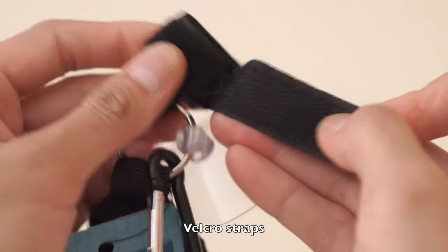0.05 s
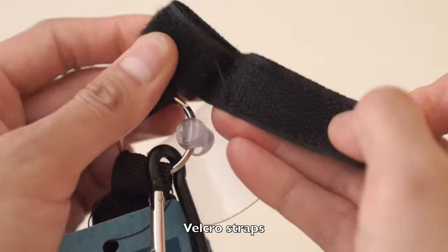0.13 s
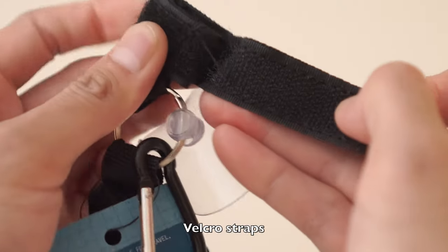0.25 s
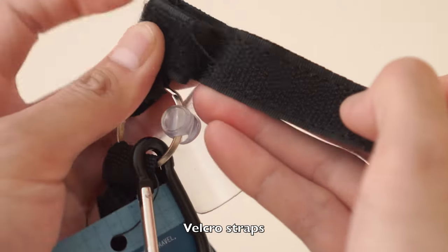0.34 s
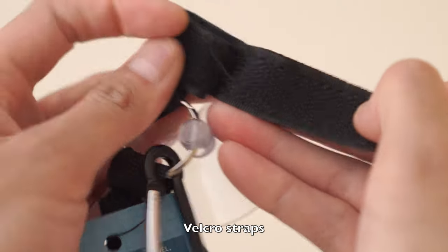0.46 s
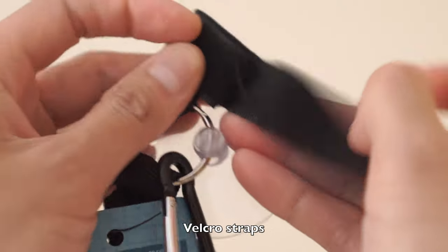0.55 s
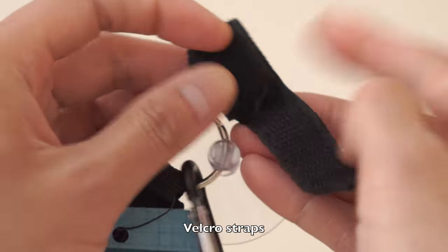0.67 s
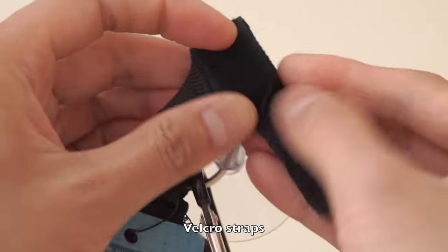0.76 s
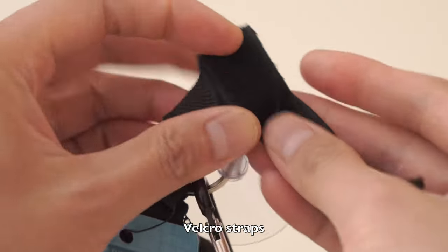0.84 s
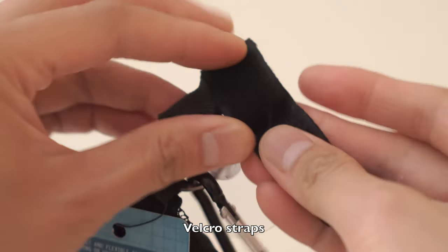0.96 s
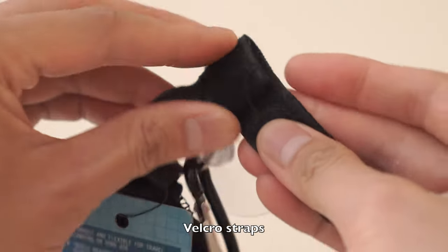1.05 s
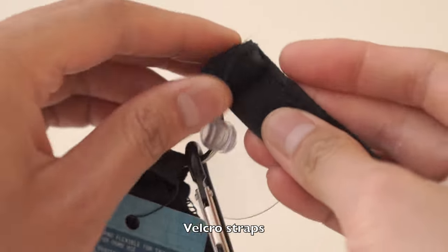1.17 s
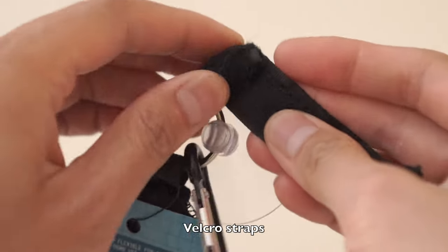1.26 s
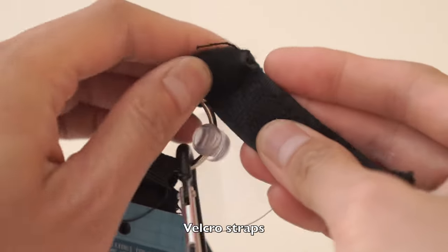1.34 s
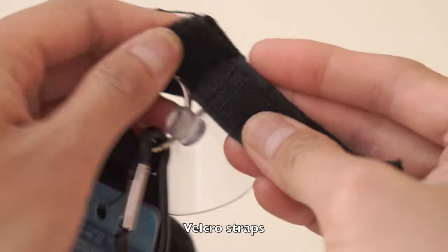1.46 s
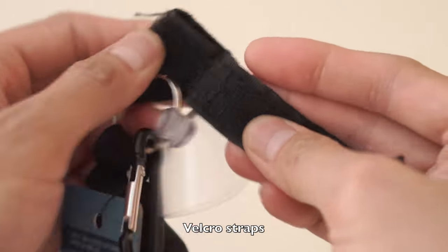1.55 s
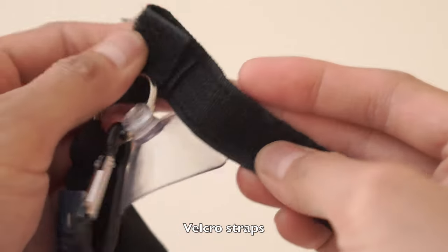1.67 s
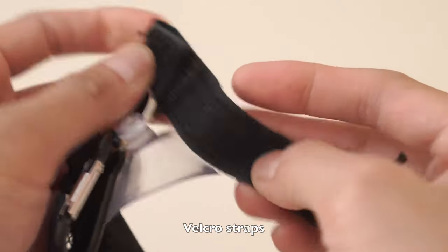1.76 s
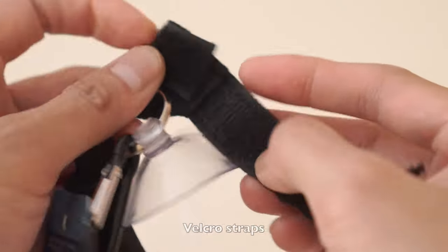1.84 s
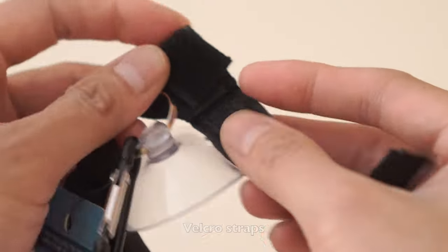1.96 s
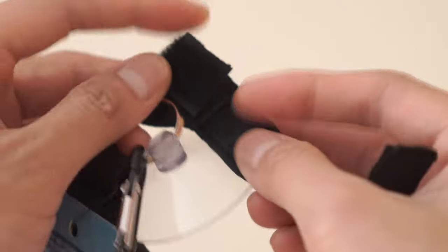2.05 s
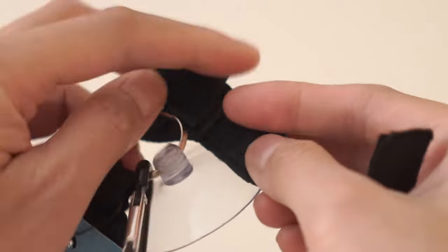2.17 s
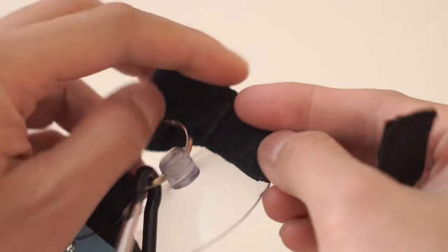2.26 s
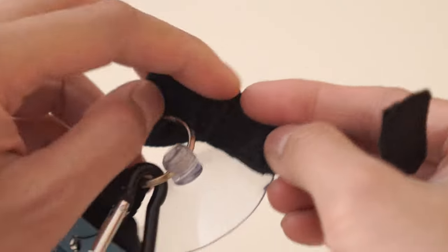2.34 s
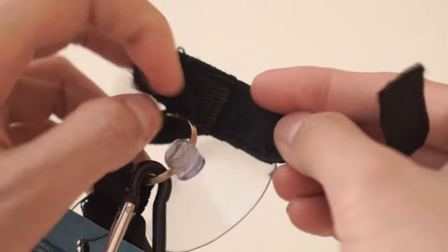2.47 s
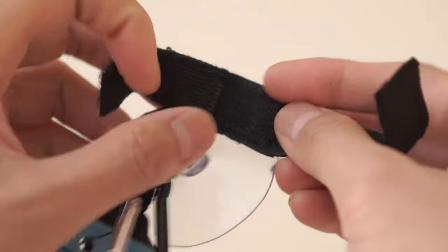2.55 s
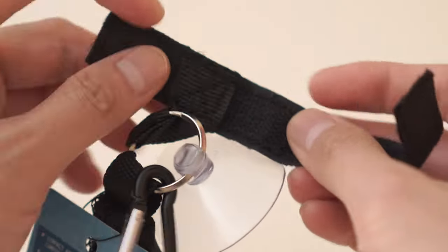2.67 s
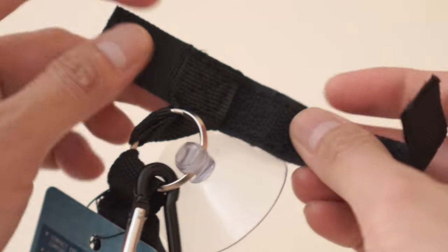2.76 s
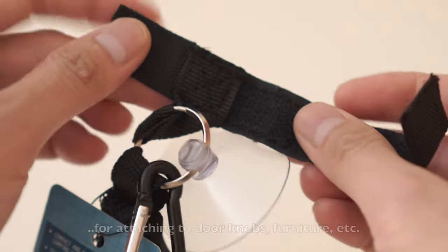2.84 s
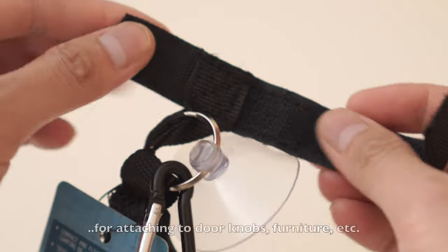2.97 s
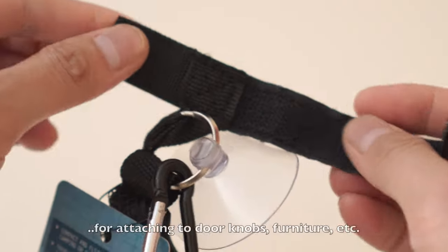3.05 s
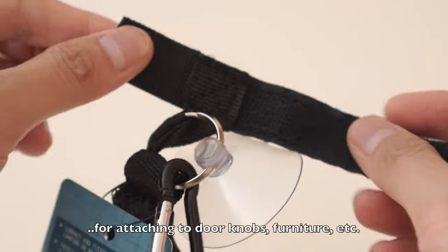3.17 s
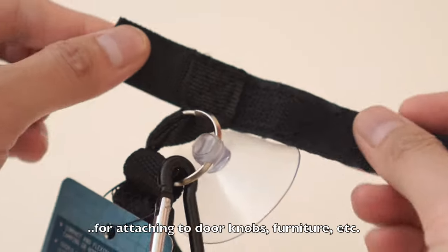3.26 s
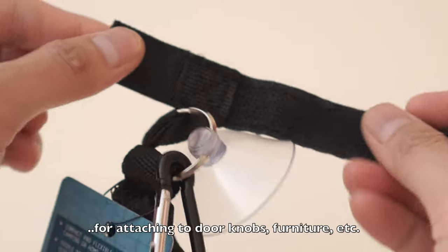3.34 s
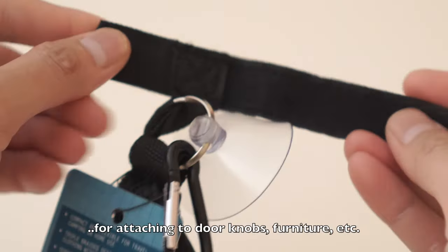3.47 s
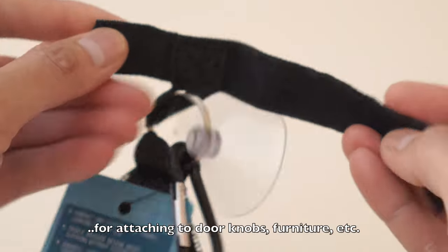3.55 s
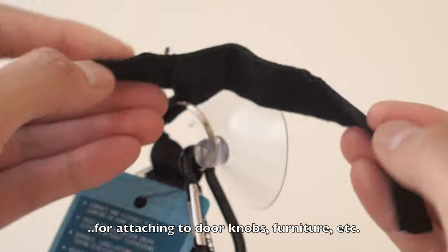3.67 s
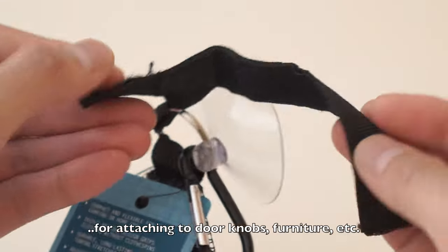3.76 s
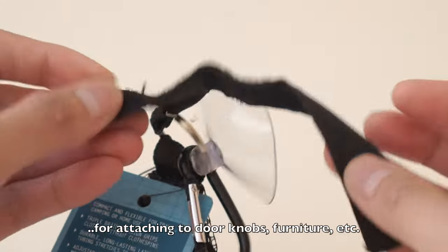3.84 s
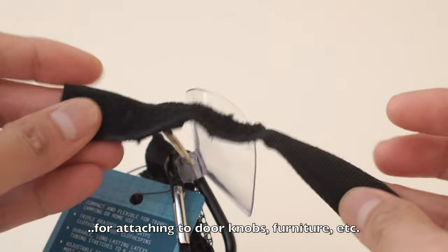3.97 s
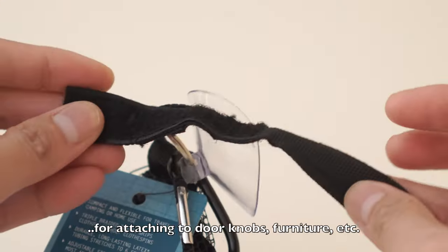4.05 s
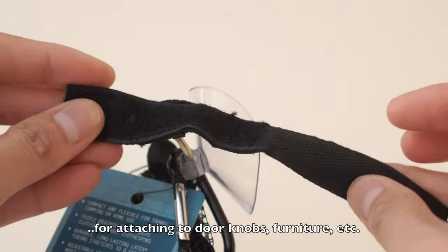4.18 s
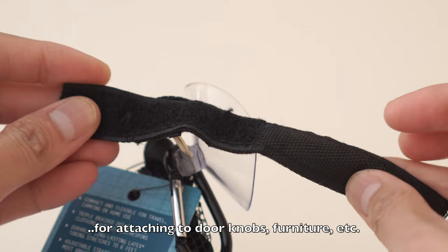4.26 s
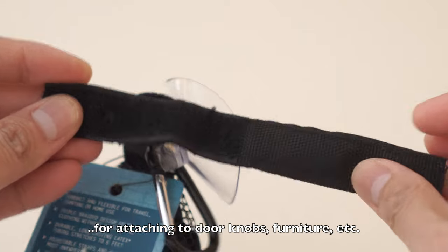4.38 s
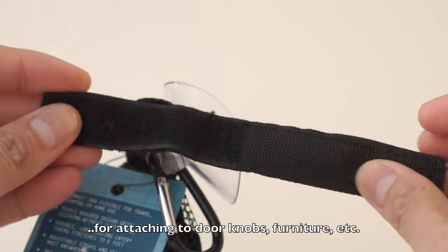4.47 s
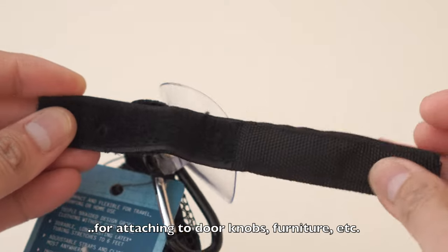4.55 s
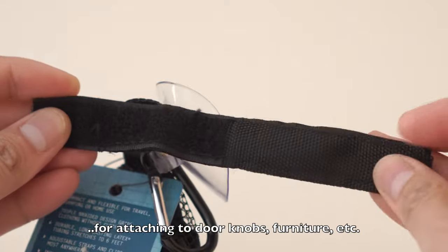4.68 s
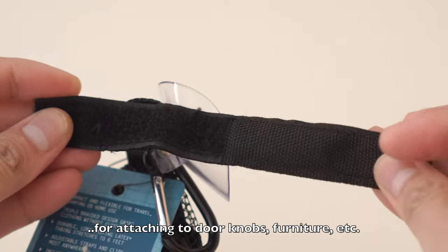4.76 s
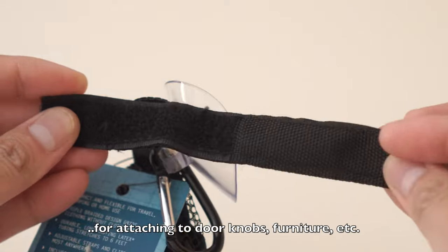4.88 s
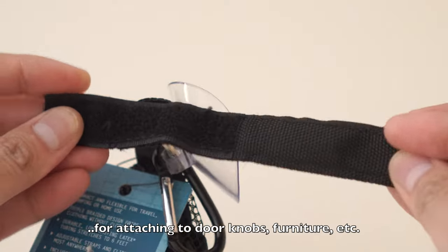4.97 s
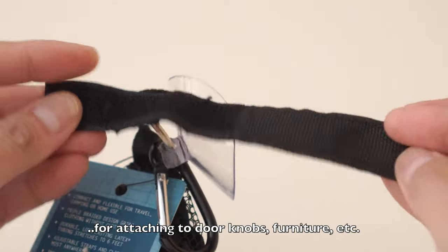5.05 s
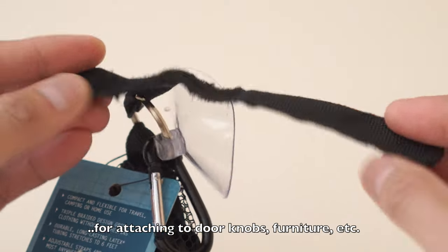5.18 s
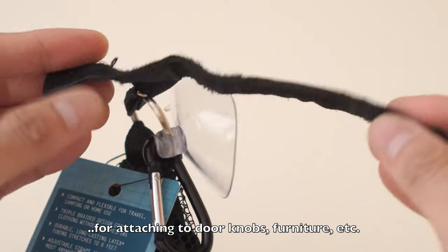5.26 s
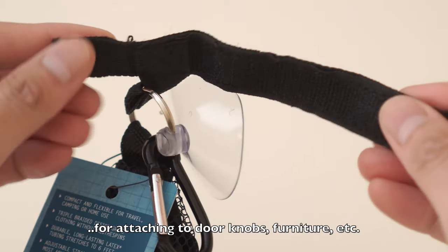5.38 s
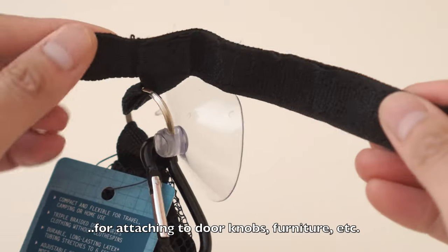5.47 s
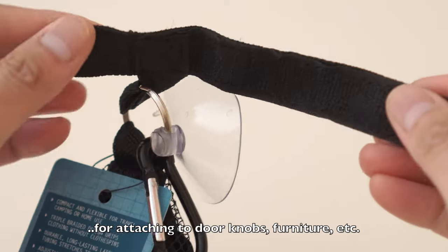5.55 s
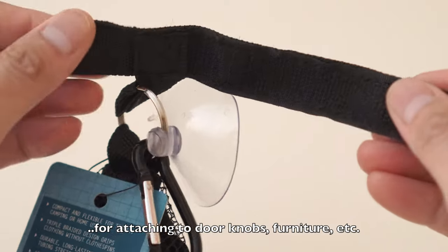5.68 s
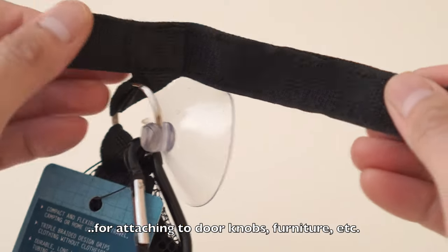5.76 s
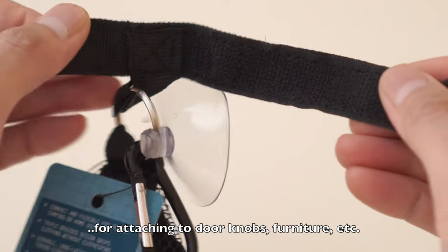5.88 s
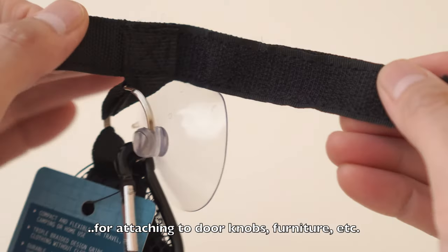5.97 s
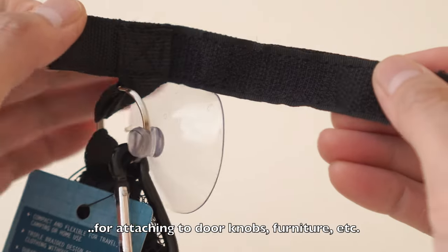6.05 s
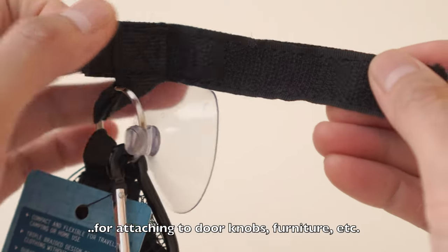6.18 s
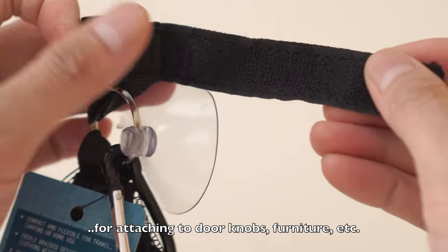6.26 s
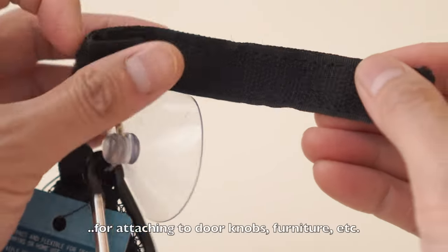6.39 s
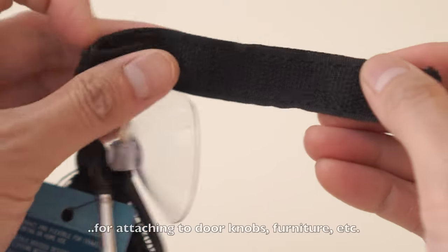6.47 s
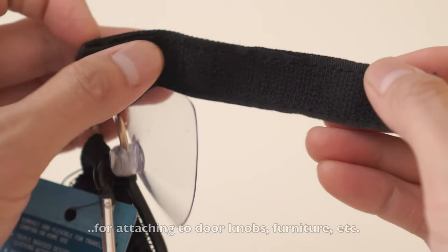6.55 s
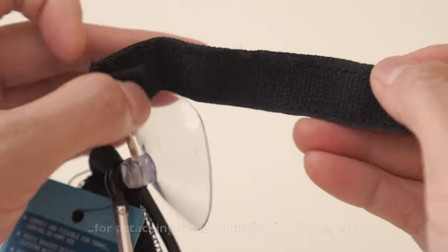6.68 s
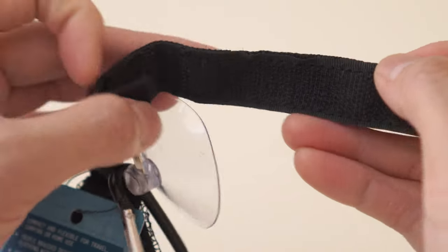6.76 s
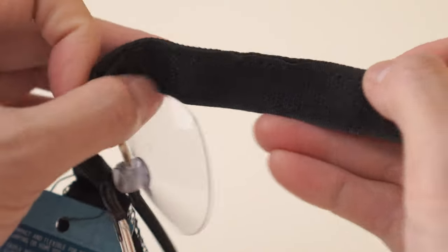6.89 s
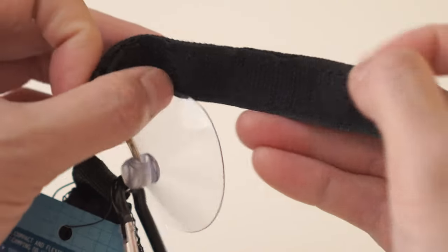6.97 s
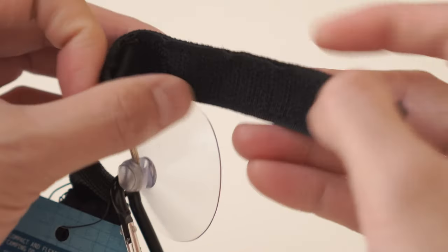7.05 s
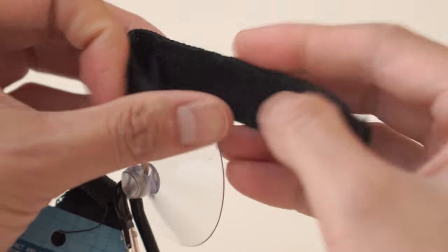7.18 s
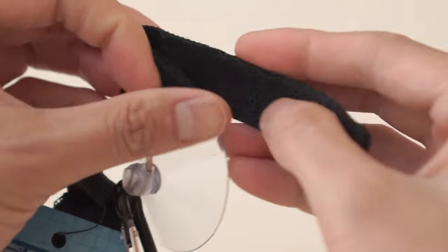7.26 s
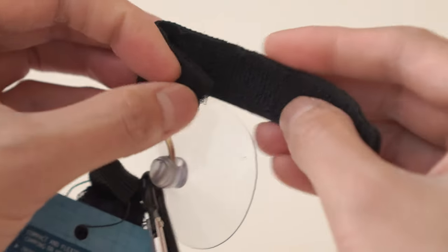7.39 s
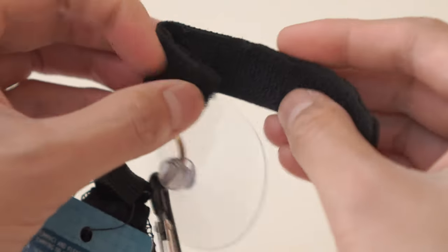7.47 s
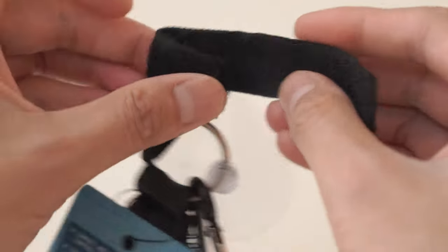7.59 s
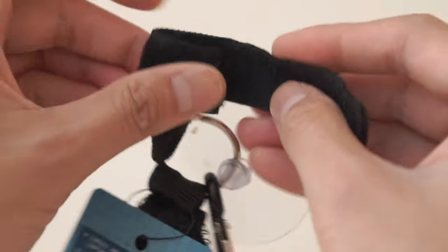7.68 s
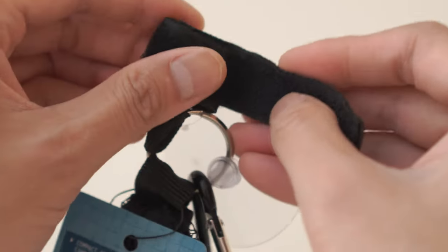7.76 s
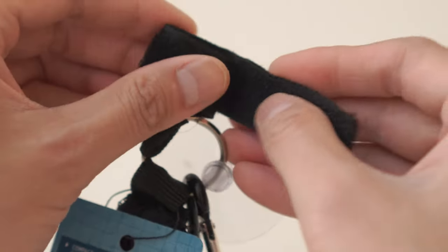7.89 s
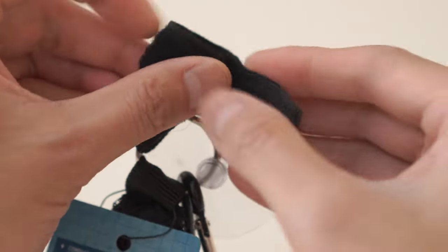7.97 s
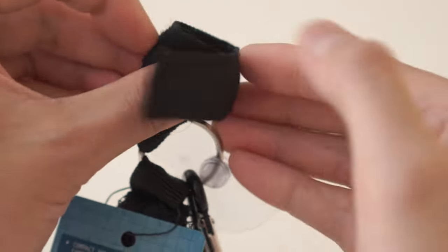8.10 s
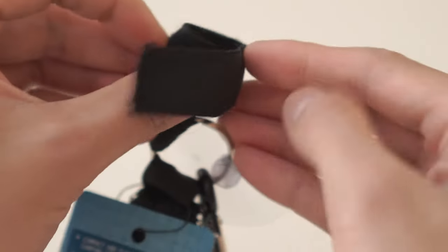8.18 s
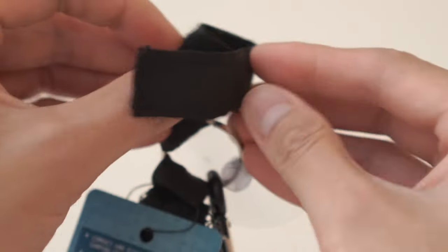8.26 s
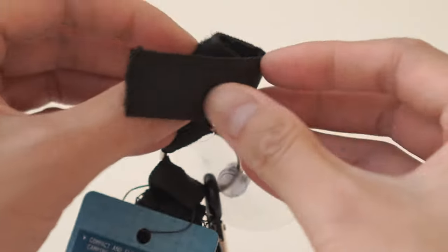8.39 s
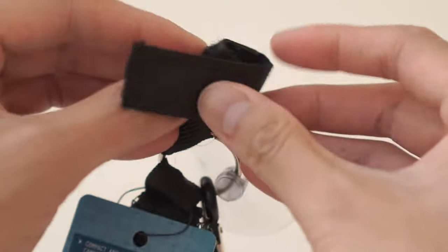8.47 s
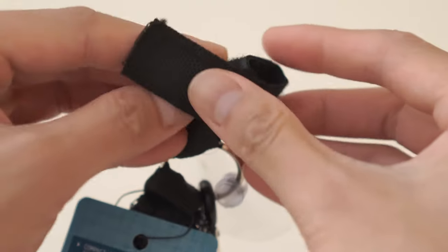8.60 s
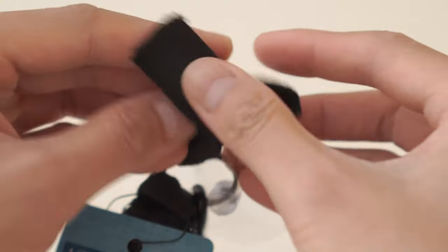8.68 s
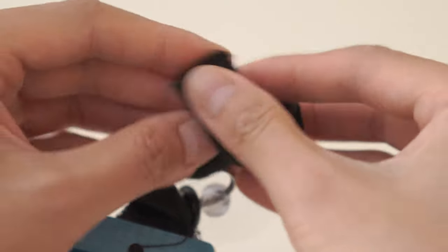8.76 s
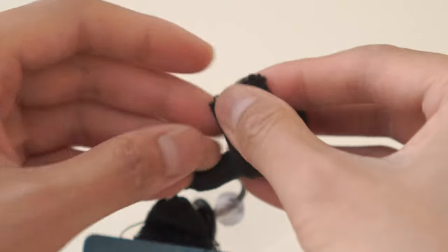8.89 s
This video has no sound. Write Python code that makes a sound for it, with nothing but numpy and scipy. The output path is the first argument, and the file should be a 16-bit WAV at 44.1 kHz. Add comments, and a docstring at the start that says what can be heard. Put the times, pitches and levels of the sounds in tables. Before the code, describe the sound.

Sharp, crisp fastener tearing in short bursts, followed by quiet webbing rubs, a light clatter of hanging fittings, and faint final ticks and zips.

```python
"""A small room with a faint hum: close to a stereo microphone, hands peel a hook-and-loop strap open,
straighten it and fold it shut again. Each tug tears a run of hooks, made of bunched clicks, with sharp snaps.
Finger strokes scratch the webbing (fibre clicks over smooth noise) and now and then skid with a short zip.
The suction cup, carabiner and steel ring hanging from the strap knock together as decaying sine modes.
The room answers with echoes that thicken into a tail, over steady air, a wavering hum and a soft rumble."""
import sys
import numpy as np
from scipy import signal
from scipy.fft import rfft, irfft, next_fast_len
from scipy.io import wavfile
from scipy.ndimage import uniform_filter1d

SR = 44100
rng = np.random.default_rng(int(sys.argv[2]) if len(sys.argv) > 2 else 0)


def dump_mix(stems):
    """Bounce the given channels to the path in sys.argv[1] as a 16-bit WAV at rate SR."""
    frames = np.atleast_2d(stems).T  # one column per channel
    limited = np.clip(frames, -1, 1)  # hard clip at full scale
    pcm = np.round(limited * 32767).astype(np.int16)
    wavfile.write(sys.argv[1], SR, pcm)


N = 393813
TIME = np.arange(N) / SR

# background swells: (time [s], hum fundamental [dB], rumble [dB])
HUM_SWELLS = [(1.4, -71, -70), (1.9, -59.5, -71), (3.0, -63.5, -73), (3.5, -68, -79.5), (4.15, -61, -71.5),
              (4.7, -75.5, -81)]
# spectrum of the room air: (frequency [Hz], density [dB per Hz, relative])
AIR_COLOUR = [(20, -15), (86, -10), (118, -9), (360, -19.5), (1280, -22.5), (1460, -17.5), (1760, -23.5),
              (4260, -35), (15000, -33.5)]
# the hanging fittings knock together:
# (time [s], suction cup [dB, relative], carabiner [dB, relative], steel ring [dB, relative])
KNOCKS = [(1.409, -60, -47.5, -60), (2.264, -69, -49, -57), (2.423, -68, -45, -39.5),
          (3.987, -45.5, -56, -61.5), (5.103, -65.5, -68, -76.5), (5.612, -60.5, -63, -68),
          (5.986, -54.5, -56, -50), (6.454, -62, -57.5, -60), (6.512, -53, -46.5, -54),
          (6.549, -40.5, -34.5, -40), (6.597, -44, -46, -53), (6.707, -51.5, -60, -64)]
# what each fitting rings with: (frequency [Hz], level [dB, relative], decay by 60 dB [s])
CUP_MODES = [(542, -8.5, 0.066), (831, 1.5, .13), (936, 1.5, .12), (1670, 8, 0.048)]
CARABINER_MODES = [(740, -2, 0.089), (1052, -4, 0.19), (1700, 1.5, 0.1), (2310, 6, 0.042),
                   (2897, 1.5, 0.059), (5240, -2, 0.053)]
RING_MODES = [(3070, 1.5, 0.063), (3450, 0.5, 0.065)]
# spectrum of the dull clack under a knock: (frequency [Hz], level [dB, relative])
CLACK_COLOUR = [(150, -17), (720, -1.5), (4500, -5), (15000, -6)]
# a fingertip skids over the weave: (time [s], length [s], pitch [Hz], level [dB])
SKIDS = [(2.026, 0.036, 2270, -56.5), (3.659, 0.025, 4900, -46.5), (8.075, 0.085, 5640, -55),
         (8.599, 0.0059, 5760, -34.5), (8.62, 0.026, 6000, -39.5), (8.78, 0.045, 5500, -49.5),
         (8.892, 0.028, 3550, -48)]
# faint rustle of the strap as the hands hold it: (time [s], level [dB])
RUSTLE = [(0, -44), (.55, -56), (.95, -54.5), (1.8, -50.5), (2.25, -58), (2.8, -56), (3.25, -68.5),
          (3.55, -56), (4.2, -68.5), (4.65, -71), (4.95, -99.5), (5.15, -63), (5.8, -64), (6.2, -71),
          (6.8, -69), (7, -58), (8.4, -60.5), (8.93, -53)]
# strokes of a finger along the webbing:
# (peak time [s], swell [s], level [dB], brightness [dB per octave])
STROKES = [(.645, 0.02, -39.5, 4), (.925, 0.027, -47.5, 1), (2.03, 0.015, -37, 1.5), (2.14, 0.013, -40, 0),
           (2.41, 0.073, -54.5, -4.5), (2.52, 0.012, -40.5, -3), (2.57, 0.016, -42.5, -2),
           (2.72, 0.03, -48, -2), (3.115, 0.1, -41.5, 2), (3.305, 0.013, -52, 7.5), (3.43, 0.0086, -48, 2),
           (3.67, 0.041, -50.5, -0.5), (3.8, 0.016, -52.5, -2), (4.416, 0.029, -40, 1),
           (6.42, 0.033, -57.5, 0.5), (7.104, 0.005, -40.5, 3), (7.29, .018, -48, 1.5),
           (7.76, 0.17, -51.5, 4.5), (8.63, 0.072, -48, 2.5), (8.87, 0.07, -44.5, 4)]
# spectrum of rubbed webbing: (frequency [Hz], level [dB, relative])
RUB_COLOUR = [(150, -12), (450, -7.5), (850, -1), (1300, -6.5), (2500, -2), (6000, 0.5), (15000, 3)]
# tugs that peel the tape, hard to open it and light while it is folded:
# (start [s], length [s], level before the rub and hook offsets [dB], brightness [dB per octave])
TUGS = [(0, .02, -34, 2), (0.122, .025, -34, 0.5), (0.178, 0.181, -51, 0), (0.402, 0.01, -37, 0.5),
        (1.064, .1, -47, 1), (1.192, .09, -48, 1), (1.348, 0.044, -39.5, 6), (1.493, 0.051, -41.5, -2.5),
        (1.614, 0.055, -39, -2), (7.701, 0.14, -59.5, -0.5), (7.961, .21, -59, 2.5)]
# single hooks letting go, from sharp loud snaps to faint ticks:
# (time [s], level [dB], brightness [dB per octave])
SINGLE_SNAPS = [(.0047, -26, -5), (0.1086, -26.5, -3), (0.111, -24, 5), (0.119, -25, 2), (0.131, -33, 4),
                (0.136, -21.5, 5), (0.1443, -26, 4), (0.1834, -22, 2.5), (0.213, -29, 2), (0.26, -28.5, 11),
                (.2893, -23, 1.5), (.3235, -32, 3), (0.334, -28, 2.5), (0.4019, -23, 5.5),
                (0.4056, -18.5, 2.5), (0.43, -31, -1), (0.9026, -37.5, -2.5), (1.0574, -26, 1.5),
                (1.1051, -22, 5.5), (1.171, -24.5, 3.5), (1.185, -16, 3), (1.188, -23, 5),
                (1.2235, -17.5, 5.5), (1.2403, -31, 0), (1.273, -24.5, -1.5), (1.2835, -33, -2),
                (1.3277, -17.5, 6), (1.35, -23.5, -1), (1.363, -20.5, 2.5), (1.3707, -23, -2.5),
                (1.381, -26, -2), (1.387, -27.5, -3), (1.478, -22.5, 1), (1.484, -18, -2),
                (1.5139, -21, -3.5), (1.517, -26.5, 0), (1.525, -20, 8), (1.5354, -28, 6), (1.559, -16, 13),
                (1.568, -27, -5), (1.604, -26, -6.5), (1.6128, -28, -1), (1.621, -31.5, -6.5),
                (1.6353, -27, 1), (1.644, -23.5, -0.5), (1.6513, -21, -1), (1.6649, -23, -3),
                (1.7159, -30, -0.5), (1.8653, -33, 16), (1.895, -30, 2.5), (2.522, -31.5, 12),
                (2.6613, -41, -1), (3.045, -33.5, 15), (4.059, -41, 5), (4.3013, -43.5, 11),
                (5.1518, -50.5, 6), (5.341, -40.5, -1.5), (5.6153, -44.5, 0), (6.088, -51, 4),
                (7.1004, -39, -5.5), (7.2118, -33.5, 13), (7.511, -43.5, 0), (7.787, -30.5, 11.5),
                (7.8376, -37, 4), (7.8575, -43, 10), (8.086, -39, -2), (8.1574, -37, 4), (8.4798, -40, -1),
                (8.601, -34, 1), (8.6256, -29, 4), (8.8524, -31, 3), (8.8586, -27, 4.5)]
# spectrum of a snap: (frequency [Hz], level [dB, relative])
SNAP_COLOUR = [(150, -36.5), (500, -28.5), (1200, -14), (2600, -3.5), (3800, -1.5), (4800, 3), (15000, 5)]
# resonances of the peeled flap pulled taut: (frequency [Hz], level [dB, relative])
FLAP_MODES = [(2950, -0.5), (5050, 0), (8800, -13.5)]

TOP_HZ = 15900  # upper limit of the sound
AIR_DB, HUM_HZ = -66, 54
RUSTLE_TILT = 0.55  # dB per octave
STROKE_FADE_S, FADE_PER_SWELL = 0.023, 0.1
TUG_ATTACK_S, TUG_RELEASE_S = 0.0074, 0.035
TUG_RUB_DB, TUG_HOOK_DB = -3, 8.5  # offsets from the level of a tug
HOOKS_PER_S, STRAYS_PER_S = 90, 12
TAUT_START_S, TAUT_END_S = 1.3, 1.7


def undb(db):
    """Decibels to gain."""
    return 10 ** (np.asarray(db) / 20)


def unit(x):
    """Scale to rms 1."""
    return x / np.sqrt(np.mean(x ** 2))


def curve(rows):
    """Each column of a table, joined by straight lines in time."""
    s, *columns = np.transpose(rows)
    return [np.interp(TIME, s, column) for column in columns]


def octave_axis(x):
    """Octaves above 1 Hz of each spectrum line."""
    return np.log2(np.maximum(np.fft.rfftfreq(x.shape[-1], 1 / SR), 1))


def colour(x, points, tilt=0):
    """Shape a sound by (Hz, dB) points, a dB per octave slope above about 2 kHz and a fall above TOP_HZ."""
    octave = octave_axis(x)
    hz, db = np.transpose(points)
    shape = np.interp(octave, np.log2(hz), db)
    slope = tilt * np.maximum(octave - 11, 0)
    top = -60 * np.maximum(octave - np.log2(TOP_HZ), 0)
    return irfft(rfft(x) * undb(shape + slope + top), x.shape[-1])


def band(x, lo_hz, hi_hz):
    """Gentle causal band-pass."""
    edges = [lo_hz, min(hi_hz, SR / 2 - 100)]
    return signal.sosfilt(signal.butter(2, edges, "band", fs=SR, output="sos"), x)


def octaves(x):
    """Overlapping octave bands that add up to the sound: (centre Hz, band) pairs."""
    centres = 250 * 2. ** np.arange(7)
    octave = octave_axis(x)
    spectrum = rfft(x)
    bands = []
    for hz in centres:
        weight = np.interp(octave, np.log2(centres), 1. * (centres == hz))
        bands.append((hz, irfft(spectrum * weight, x.shape[-1])))
    return bands


def resonance(x, hz, q):
    """A damped resonance, gain 1 at its centre."""
    b, a = signal.iirpeak(min(hz, .45 * SR), max(q, 1), fs=SR)
    return signal.lfilter(b, a, x)


def spread(mid, side):
    """Left and right from mid and side."""
    return np.array([mid + side, mid - side])


def add(out, s, sound):
    """Mix a sound in at a time, trimmed to the scene."""
    start = int(s * SR)
    sound = sound[:, max(-start, 0):N - start]
    first = max(start, 0)
    out[:, first:first + sound.shape[1]] += sound


def background(side_share=0.95, waver=0.53):
    """Steady room air, alike on both sides in the bass, under a wavering hum and a soft rumble."""
    mid, side = colour(rng.standard_normal((2, next_fast_len(N))), AIR_COLOUR)[:, :N]
    air = spread(mid, side_share * band(side, 230, TOP_HZ)) / np.std(mid)
    hum_db, rumble_db = curve(HUM_SWELLS)
    turn = 2 * np.pi * HUM_HZ * TIME
    wavering = 1 + waver * unit(band(rng.standard_normal(N), 2, 4.4))
    hum = undb(hum_db) * wavering * (np.sin(turn) + np.sin(2 * turn) / np.pi)
    rumble = undb(rumble_db) * unit(band(rng.standard_normal(N), 137.4, 203))
    return undb(AIR_DB) * air + hum + rumble


def room_tail(wet_db=-10, low_wet_db=-6, first_s=0.0012, side_low=0.32, side_high=0.98):
    """Near walls return separate echoes that thicken into a tail: longer in the lows, wider in the treble."""
    t60_low, t60_high, thick_s = .38, .23, .05
    age = np.arange(SR // 2) / SR
    density = np.clip((age / thick_s) ** 2, .02, 1)
    present = rng.standard_normal((2, len(age))) * (rng.random(len(age)) < density)
    echoes = present / np.sqrt(density)
    tail = 0
    for hz, (mid, side) in octaves(echoes):
        # 0 up to 1 kHz, 1 at 16 kHz
        height = np.clip(np.log(hz / 1000) / np.log(16), 0, 1)
        t60 = t60_low + height * (t60_high - t60_low)
        fade = np.exp(-np.log(1000) * age / t60) * np.clip(age / first_s - 1, 0, 1)
        gain = undb(low_wet_db + height * (wet_db - low_wet_db)) / np.sqrt(np.sum(fade ** 2))
        width = np.interp(height, [0, .5], [side_low, side_high])
        tail = tail + gain * fade * spread(mid, side * width)
    return tail


def room(x, count=5):
    """The hands keep moving, so the sound crossfades round a ring of reflection patterns, 12 a second."""
    place = TIME * 12 % count
    out = 0
    for k in range(count):
        away = np.abs((place - k + count / 2) % count - count / 2)
        share = np.sqrt(np.clip(1 - away, 0, 1))
        out = out + signal.oaconvolve(x * share, room_tail(), axes=1)[:, :N]
    return out


def fittings(chatter_s=.004, clack_db=-9, clack_growth=0.72, clack_s=0.018, rebound=0.56, detune=0.027):
    """A knock rattles briefly and rings cup, carabiner and ring as hard as each is touched, over a clack."""
    out, age = np.zeros((2, N)), np.arange(SR // 3) / SR
    for s, *levels in KNOCKS:
        for modes, db in zip((CUP_MODES, CARABINER_MODES, RING_MODES), levels):
            hz, mode_db, t60 = np.transpose(modes)[:, :, None]
            # the spot of contact favours some modes and slights others
            spot = .5 + rng.random(hz.shape)
            fade = spot * undb(db + mode_db) * np.exp(-np.log(1000) * age / t60) / 2
            # the loose parts touch again within milliseconds, each time a little differently
            waits = np.cumsum(rng.exponential(chatter_s, size=3))
            strengths = rng.uniform(0, rebound, size=len(waits))
            for wait, strength in zip([0, *waits], [1, *strengths]):
                pitch = hz * (1 + detune * (wait > 0) * rng.standard_normal(hz.shape))
                cycles = pitch * age + rng.random(hz.shape)
                ring = np.sum(fade * np.sin(2 * np.pi * cycles), axis=0)
                add(out, s + wait, spread(strength * ring, 0))
        rattle = rng.standard_normal((2, len(age))) * np.exp(-age / clack_s)
        mid, side = colour(rattle, CLACK_COLOUR)
        # a light touch gives mostly clack and little ring
        force = np.linalg.norm(undb(levels)) ** clack_growth
        add(out, s, force * undb(clack_db) * spread(mid, band(side, 2000, TOP_HZ) / 2))
    return out


def skids(roughness=1.0, scrape_db=-9):
    """The ribs of the weave chatter in a narrow band, over a broad scrape, as a finger slips."""
    out = np.zeros((2, N))
    for s, length, hz, db in SKIDS:
        count = int(length * SR)
        uneven = np.exp(roughness * rng.standard_normal(count))
        chatter = unit(rng.standard_normal(count) * uneven)
        narrow = unit(band(chatter, hz / 1.195, hz * 1.41))
        skid = narrow + undb(scrape_db) * chatter
        add(out, s, undb(db) * spread(skid * signal.windows.tukey(count), 0))
    return out


def stroke_gain(peak, swell):
    """A stroke gathers speed and fades; slow strokes fade more slowly."""
    fade = STROKE_FADE_S + FADE_PER_SWELL * swell
    fall = np.where(TIME < peak, ((TIME - peak) / swell) ** 2, (TIME - peak) / fade)
    return np.exp(-np.minimum(fall, 20))


def tug_gain(start, length):
    """A tug takes hold quickly, peels evenly and dies away."""
    hold = np.clip((TIME - start) / TUG_ATTACK_S + 1, 0, 1)
    release = np.exp(-np.clip((TIME - start - length) / TUG_RELEASE_S, 0, 20))
    return undb(TUG_RUB_DB) * hold * release


def sliding():
    """Level and brightness of the webbing: rustle, tugs and strokes add up, and the strongest sets the colour."""
    power = undb(curve(RUSTLE)[0]) ** 2
    bright = RUSTLE_TILT * power
    for rows, gain in ((TUGS, tug_gain), (STROKES, stroke_gain)):
        for s, length, db, tilt in rows:
            move = (undb(db) * gain(s, length)) ** 2
            power, bright = power + move, bright + tilt * move
    return 10 * np.log10(power), bright / power


def shifting_grip(x, patchy_db=2):
    """The grip shifts, so narrow bands of friction come and go within a few hundredths of a second."""
    cells = signal.stft(x, nperseg=256)[2]
    drift = rng.standard_normal(cells.shape[1:])
    drift = uniform_filter1d(drift, size=6, axis=0)  # over neighbouring frequencies
    drift = uniform_filter1d(drift, size=12, axis=1)  # over time
    return signal.istft(cells * undb(patchy_db * unit(drift)))[1]


def webbing(catch_db=1.5, side_share=0.35):
    """Countless fibres catch and slip: tiny clicks of very uneven size over the smooth rub of the cloth."""
    fibres_per_s, scatter_db, largest, fibre_hz = 5000, 4.2, 5.6, 2500
    size = next_fast_len(N)
    strength = undb(scatter_db * np.minimum(rng.exponential(size=size), largest))
    caught = rng.random(size) < fibres_per_s / SR
    clicks = unit(caught * strength * np.sign(rng.standard_normal(size)))
    scratch = band(clicks, fibre_hz, SR) + band(rng.standard_normal(size), 14, fibre_hz)
    # fibres give way in bunches a few milliseconds long
    bunches = unit(uniform_filter1d(rng.standard_normal(size), size=200))
    scratch = scratch * undb(catch_db * bunches)
    stereo = spread(scratch, side_share * scratch * rng.standard_normal(size))
    grain = shifting_grip(stereo)[:, :size]
    grain = unit(colour(grain, RUB_COLOUR))
    db, tilt = sliding()
    out = 0
    for hz, part in octaves(grain):
        # brightness pivots at 9.5 kHz and levels off below 2 kHz
        slope = np.log2(max(hz, 2000) / 9500)
        out = out + part[:, :N] * undb(db + tilt * slope)
    return out


def torn_hooks(scatter_db=3, tilt_spread=4):
    """Each tug tears a quick, uneven run of hooks: rows (time [s], level [dB], tilt [dB per octave])."""
    rows = []
    for start, length, db, tilt in TUGS:
        chance = rng.standard_normal((40, 3))
        for k, (when, size, hue) in enumerate(chance[:int(length * HOOKS_PER_S) + 1]):
            s = start + (k + when % 1) / HOOKS_PER_S
            rows.append((s, db + TUG_HOOK_DB + scatter_db * size, tilt + tilt_spread * hue))
    return rows


def stray_hooks(tick_db=6, scatter_db=3, tilt=4):
    """Single hooks catch and tick, louder with the rustle: rows (time [s], level [dB], tilt [dB per octave])."""
    when, size = rng.random((int(STRAYS_PER_S * N / SR), 2)).T
    s = (np.arange(len(when)) + when) / STRAYS_PER_S
    db = np.interp(s, *np.transpose(RUSTLE)) + tick_db + scatter_db * (2 * size - 1)
    return [(at, level, tilt) for at, level in zip(s, db)]


def flap(x, s, q=7, drift=.04, hook_hz=10000, hook_db=-1):
    """Each hook has its own pitch; the taut flap adds its resonances, which vary a little from hook to hook."""
    shift = np.exp(drift * rng.standard_normal())
    own_hz = hook_hz * 2 ** rng.uniform(-0.55, 0.29)
    out = x + undb(hook_db) * resonance(x, own_hz, q)
    if TAUT_START_S < s < TAUT_END_S:
        out = out + sum(undb(db) * resonance(x, hz * shift, q) for hz, db in FLAP_MODES)
    return out


def snaps(shiver_db=-24, neighbour_s=.0008, neighbour_db=-3, follower_s=0.012, follower_db=-16, lone_slope=0.14):
    """A hook flicks free and tears its neighbours with it; the tape shivers, and a few weaker hooks follow."""
    out, size, lead = np.zeros((2, N)), 2048, 64  # samples; the lead is silence before the flick
    decay_s = .0022
    age = np.arange(size - lead) / SR
    for s, db, tilt in SINGLE_SNAPS + torn_hooks() + stray_hooks():
        flick = 1. * (age == 0)
        # the weaker the snap, the more it is one lone hook
        lone_db = lone_slope * min(db + 26.5, 0)
        for wait_s, hook_db in ((neighbour_s, neighbour_db), (follower_s, follower_db)):
            late = (rng.exponential(wait_s, size=4) * SR).astype(int) % len(age)
            flick[late] += undb(hook_db + lone_db) * rng.uniform(-1.4, 1, len(late))
        # the flicks reach both sides alike, the shiver of the tape does not
        shiver = rng.standard_normal((2, len(age))) * np.exp(-age / decay_s)
        mid, side = shiver * undb(shiver_db + lone_db)
        ringing = flap(spread(flick + mid, side / 2), s)
        snap = colour(np.pad(ringing, ((0, 0), (lead, 0))), SNAP_COLOUR, tilt)
        # the level counts the energy of the snap as if it lasted 3 ms
        power = np.sum(snap.mean(axis=0) ** 2) / (.003 * SR)
        add(out, s - lead / SR, snap * undb(db) / np.sqrt(power))
    return out


def scene():
    """Strap and fittings near the microphone, with the room behind them."""
    near = snaps() + webbing() + skids() + fittings()
    return near + room(near) + background()


def record(dry):
    """The camera's microphone cuts the top: a steep elliptic low-pass at TOP_HZ."""
    return signal.sosfilt(signal.ellip(10, .2, 70, TOP_HZ, fs=SR, output="sos"), dry)


dry = scene()
out = record(dry)
dump_mix(out)
```